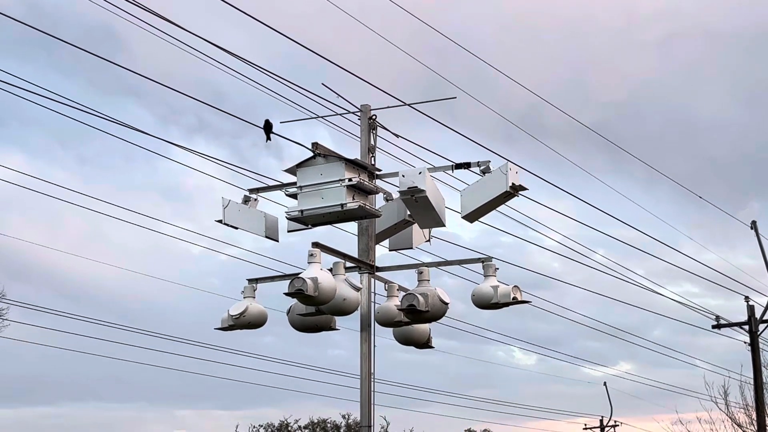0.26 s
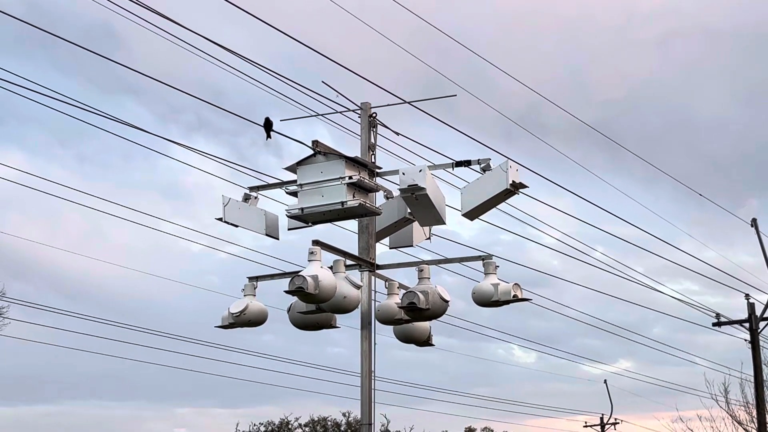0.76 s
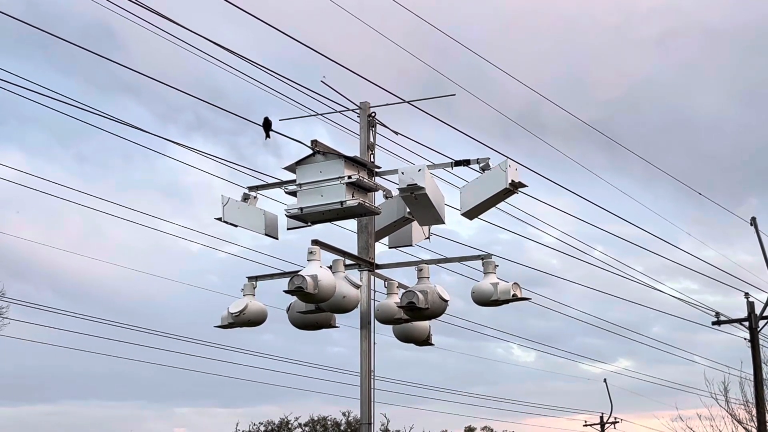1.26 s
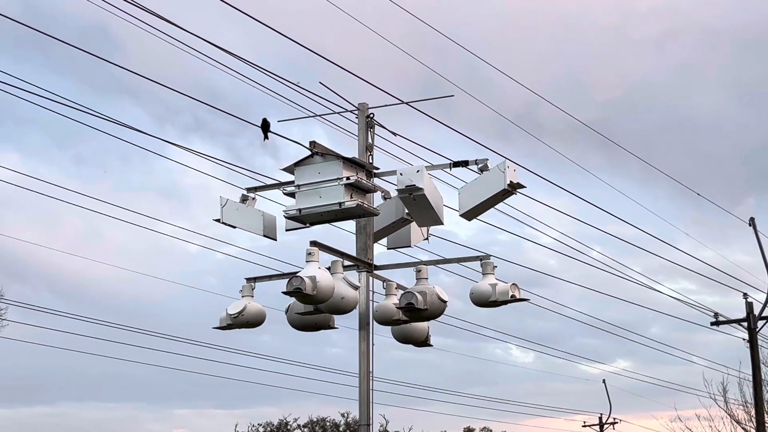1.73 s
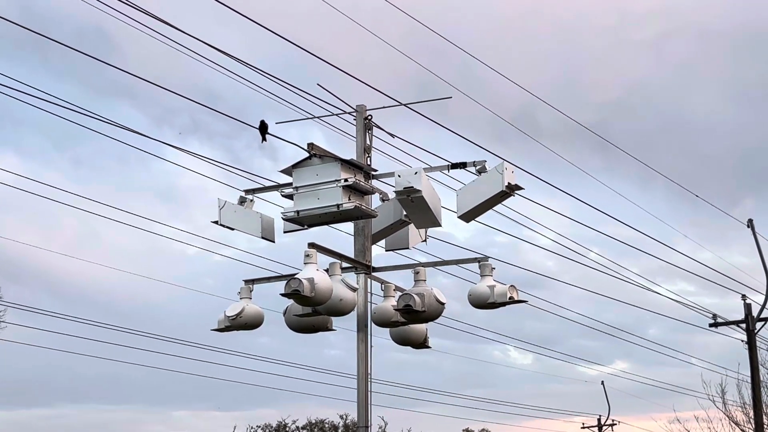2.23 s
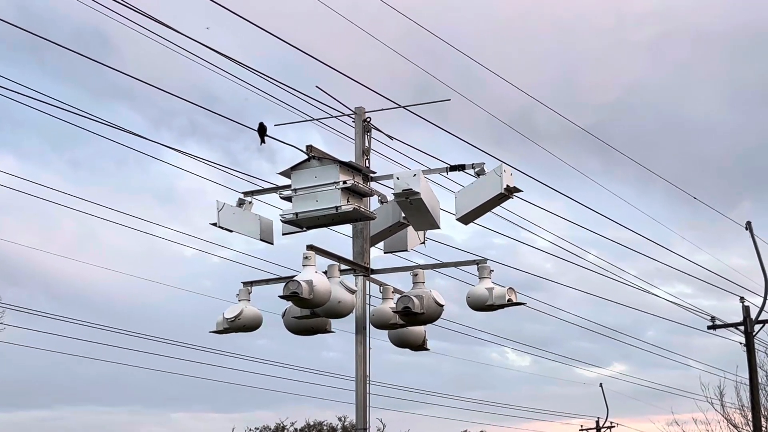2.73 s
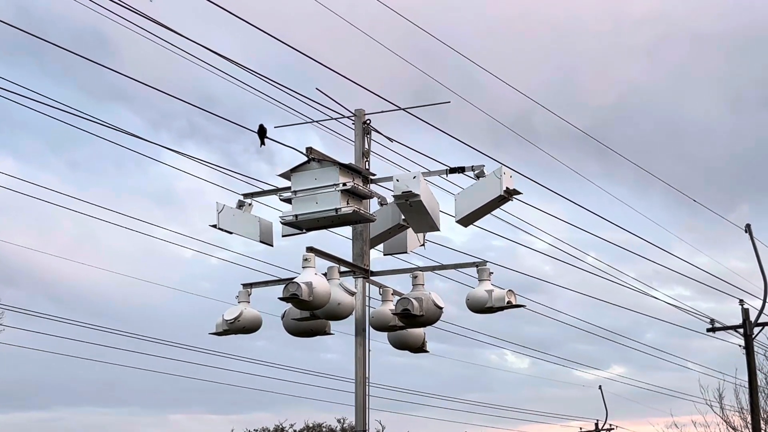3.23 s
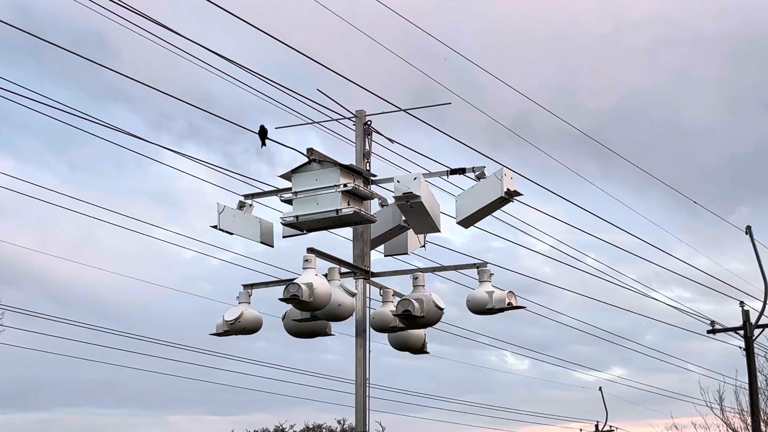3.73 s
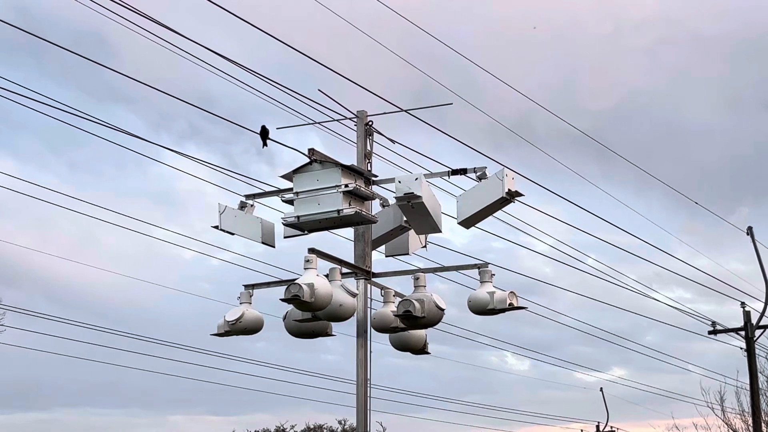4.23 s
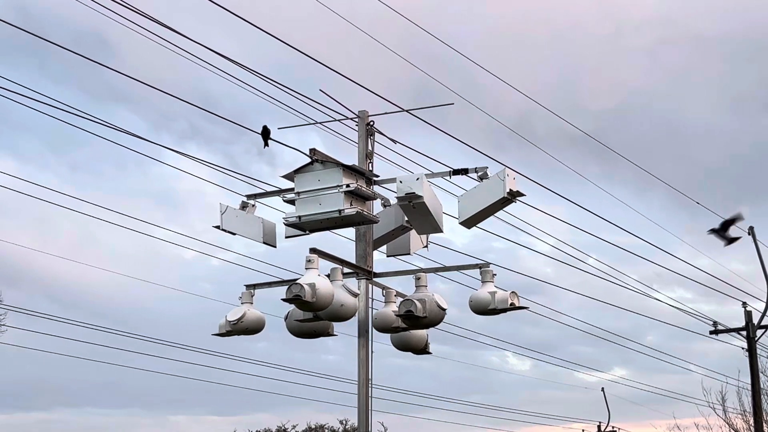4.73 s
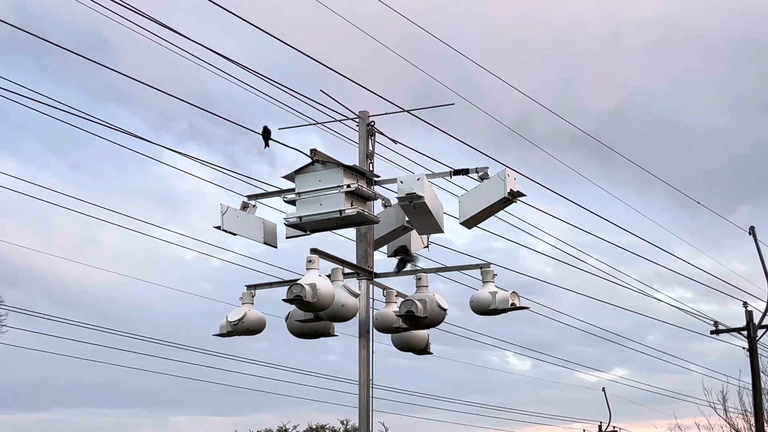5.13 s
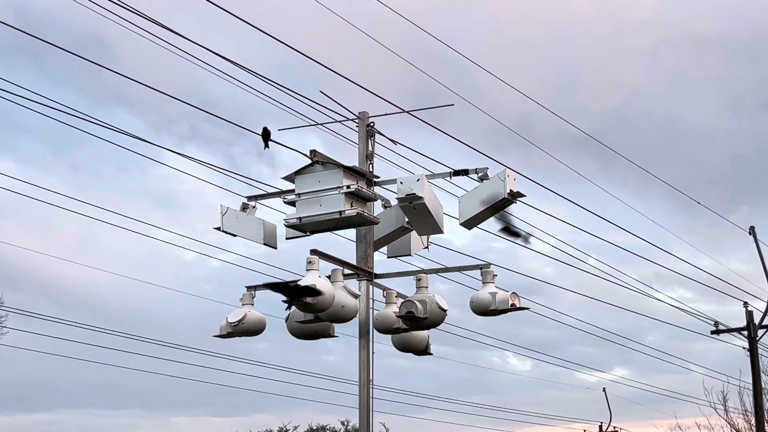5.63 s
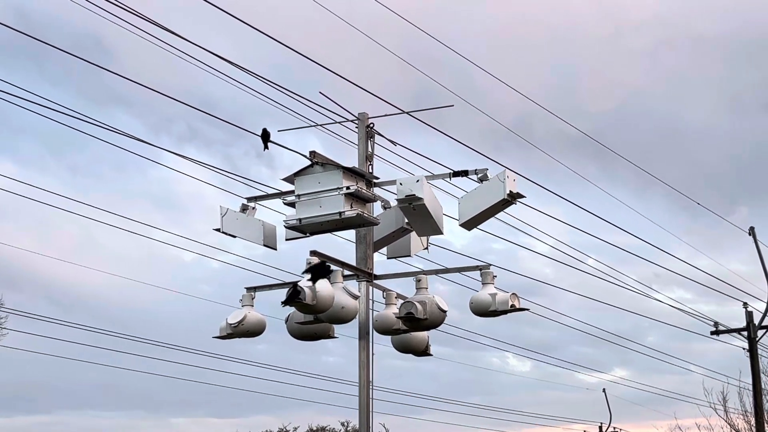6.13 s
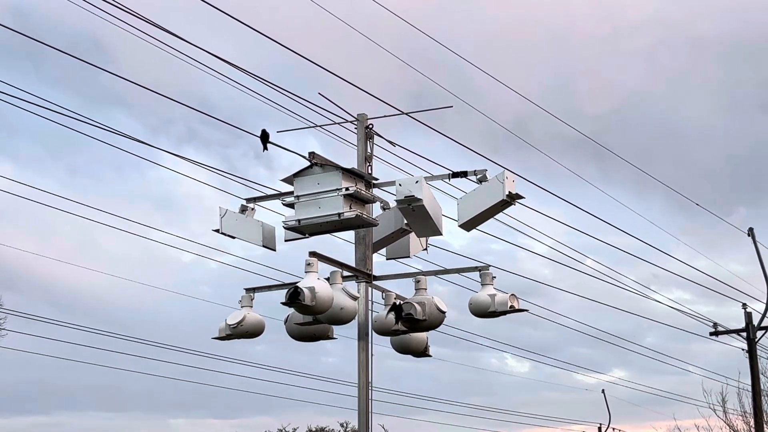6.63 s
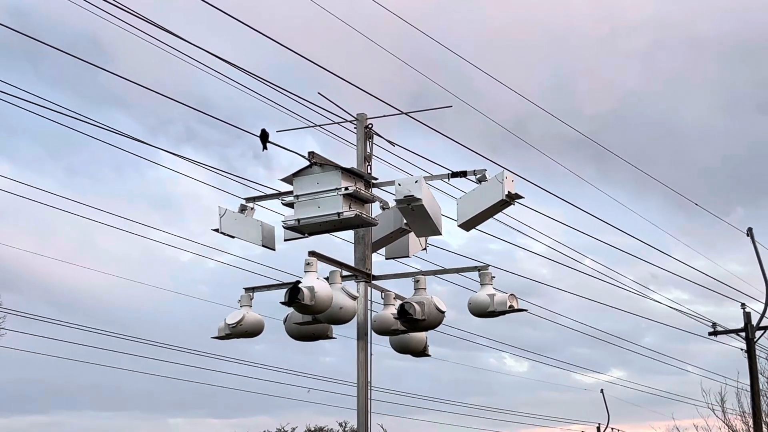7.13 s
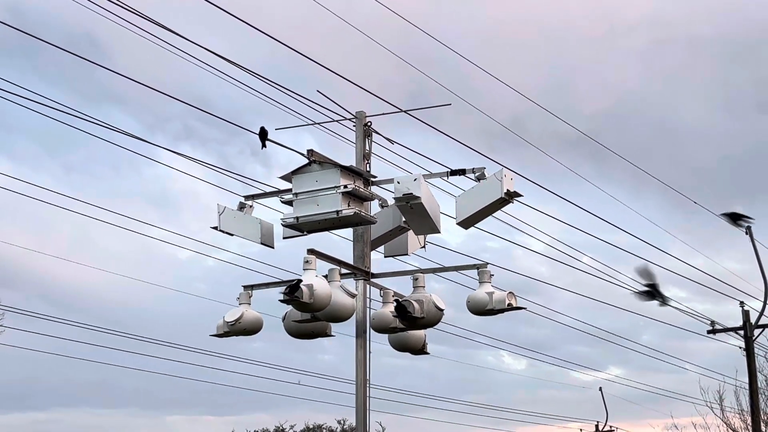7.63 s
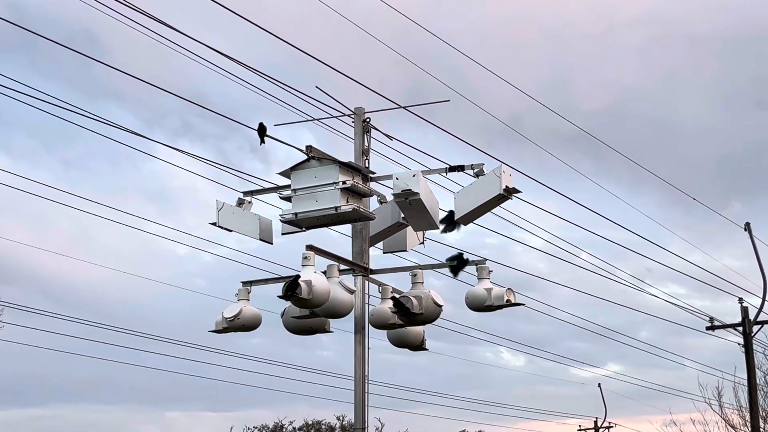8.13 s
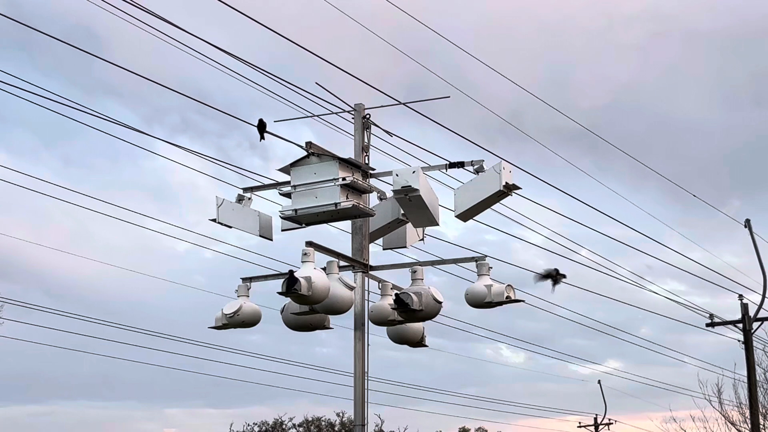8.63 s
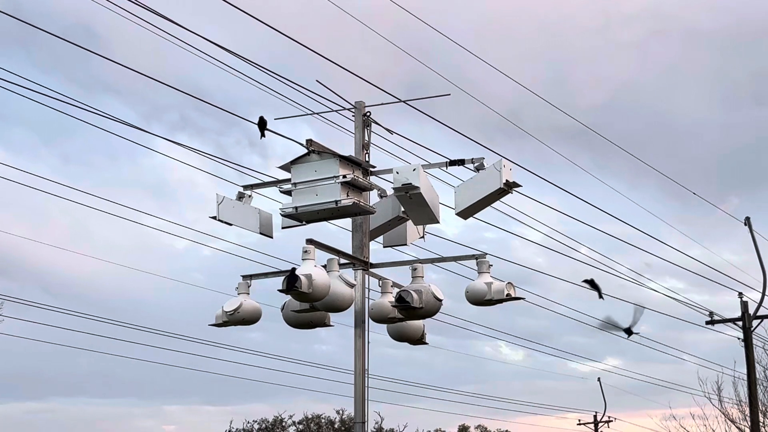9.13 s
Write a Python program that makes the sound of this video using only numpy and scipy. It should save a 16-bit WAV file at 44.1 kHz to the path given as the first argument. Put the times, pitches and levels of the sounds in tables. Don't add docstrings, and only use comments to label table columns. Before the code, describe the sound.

A small swallow colony at nest boxes on a pole, outdoors over a steady low town rumble. A faint songbird phrase and small pips come first, then scattered burry whistles falling in pitch. Around halfway, loud quick chirps and liquid gulping runs crowd in, with a far flock behind. The songbird returns, calls grow stronger, and a dry rattle comes near the end. Small stereo camera microphone, with short wall echoes.

```python
import sys
import numpy as np
from scipy import signal
from scipy.fft import rfft, irfft, next_fast_len
from scipy.io import wavfile
from scipy.ndimage import uniform_filter1d

SR = 44100
rng = np.random.default_rng(int(sys.argv[2]) if len(sys.argv) > 2 else 0)


def gain_from_db(level_db):
    decades = np.asarray(level_db, float) / 20
    return 10 ** decades


def dump(signal):
    limited = np.clip(np.atleast_2d(signal).T, -1, 1)
    pcm = np.round(limited * 32767).astype(np.int16)
    wavfile.write(sys.argv[1], SR, pcm)


N = 412776

# (frequency [Hz], level per Hz [dB])
TOWN = [(21, -65), (35, -4), (87, -1.5), (122, -9), (156, -9), (203, -18.5), (584, -24), (859, -23.5),
        (1290, -29.5), (1680, -20), (2360, -35.5), (4970, -42.5), (11000, -71), (14300, -106),
        (22000, -120)]
# (frequency [Hz], level per Hz [dB])
TOWN_SIDE = [(21, -47), (35, -17), (92, -10.5), (277, -20), (305, -19), (407, -17.5), (1770, -17),
             (2300, -34), (4970, -107), (5740, -37.5), (11000, -64), (14300, -104), (22000, -120)]
# (frequency [Hz], share [0-1], phase turn [rad])
LINKED = [(100, 0.5, 1.5), (400, 0.4, 0.8), (1110, 0.45, 0.94), (1600, 0.2, 2.4), (6000, 1, 1.57)]
TOWN_DB, TOWN_SIDE_DB = -47.5, -57
HUM_HZ, HUM_WIDTH_HZ, HUM_DB = 94.5, 10.4, -50

# (multiple of the pitch [-], level [dB])
OVERTONES = [(2, -17), (3, -25.5), (4, -35), (5, -32), (6, -29)]
BRIGHT_HZ, BRIGHT_DB_PER_OCTAVE = 3600, 18.5
EDGE_HZ = 15790

# (time after its start [s], length [ms], first pitch [Hz], last pitch [Hz], peak [dB])
PHRASE = [(0, 22, 3690, 3910, -56.5), (.018, 65, 3900, 3870, -61), (.01, 17, 2920, 2560, -59),
          (.066, 26, 4560, 4280, -71), (0.098, 24.3, 2680, 3000, -50.5), (.134, 19, 2960, 2680, -59),
          (.185, 40, 1940, 2780, -60), (.237, 30, 2505, 3070, -51.5)]
# (time [s], level [dB])
PHRASES = [
    (-.105, 1),
    (0.174, 2),
    (0.456, 3),
    (6.203, 2),
    (6.488, 1.5),
    (6.76, 3),
    (7.042, 3.5),
]
# (from [s], to [s])
PAUSE = (.63, 6.2)
SONG_ECHO_S, SONG_ECHO_DB = 0.13, -8

# (time [s], length [ms], first pitch [Hz], peak [dB])
PIPS = [(.001, 20, 2880, -65), (.93, 17, 2690, -50), (1.012, 36, 2160, -57), (1.092, 33, 2630, -58),
        (1.106, 29, 2310, -54), (1.246, 19, 2240, -57), (1.307, 13, 2300, -63), (1.365, 16, 3530, -49.5),
        (1.384, 9, 3300, -56), (1.398, 32, 3450, -58), (1.394, 10, 4760, -67), (1.429, 29, 3150, -51.5),
        (1.479, 33, 2714, -54), (1.534, 14, 2330, -55), (1.548, 40, 3600, -58), (1.575, 40, 3840, -57.5),
        (1.605, 42, 3360, -57), (1.593, 17, 2250, -52), (1.918, 25, 2110, -70), (2.893, 19, 2450, -54),
        (4.674, 11, 2110, -49), (4.682, 34, 2590, -53), (4.71, 28, 3250, -58), (5.184, 18, 3600, -51),
        (5.543, 41, 2040, -52.5), (5.583, 30, 1940, -50), (5.591, 18, 3900, -53), (5.647, 35, 2340, -51.5),
        (5.986, 13, 2370, -48), (6.296, 27, 3020, -46), (6.348, 16, 2975, -47.5), (6.515, 20, 2370, -55),
        (6.54, 22, 2110, -56), (6.575, 40, 2170, -54.5), (7.53, 16, 3940, -67), (7.66, 32, 2810, -61),
        (8.194, 18, 2630, -50), (8.268, 16, 2670, -52), (9.034, 39, 2230, -48)]
# (time [s], length [ms], first pitch [Hz], peak [dB])
SLIDES = [(1.305, 11, 2830, -55.5), (1.417, 35, 3000, -57), (1.425, 19, 5020, -61),
          (1.856, 32, 3600, -45.5), (1.871, 40, 5400, -57.5), (.15, 18, 4130, -61), (8.99, 15, 3280, -60),
          (2.898, 23, 5530, -60), (4.641, 31, 3850, -43.5), (4.663, 30, 5600, -56.5),
          (4.991, 16, 5000, -64), (2.918, 30, 3130, -48), (4.982, 18, 3480, -40.5),
          (5.013, 23.5, 3425, -37.5), (5.204, 28, 6000, -67), (5.19, 38, 3800, -41.5),
          (5.276, 24, 3350, -39.5), (5.309, 28, 3370, -37.5), (5.326, 49, 5450, -54.5),
          (5.718, 18, 3163, -45.5), (5.831, 33, 3740, -38), (5.995, 36, 4810, -49.5), (7.8, 57, 3030, -47),
          (8.208, 34, 3600, -72), (8.3, 25, 3160, -51), (8.786, 13, 2920, -56), (9.0, 12, 3310, -46),
          (9.012, 9.9, 4720, -49), (9.021, 14, 5760, -57)]
# (time [s], length [ms], first pitch [Hz], peak [dB])
DIPS = [(1.4, 15, 5040, -62), (1.402, 16, 2400, -60), (1.436, 18, 4460, -61), (1.455, 21, 4140, -55),
        (1.901, 32, 2820, -51), (2.948, 22, 2480, -51.5), (5.025, 18, 4960, -67), (4.598, 11, 3170, -59),
        (4.683, 23, 3770, -54), (4.73, 21, 3740, -54), (5.233, 29, 3890, -48), (5.238, 22, 5500, -65),
        (5.36, 37, 4740, -57), (5.547, 50, 4220, -54.5), (5.608, 13.6, 3340, -45.5),
        (6.036, 22, 3670, -46.5), (6.646, 71, 3700, -59), (6.938, 29, 4080, -56.5),
        (7.525, 8.6, 3530, -46.5), (7.545, 8.7, 3360, -48), (7.555, 19, 4530, -67),
        (7.768, 14.4, 3290, -43.5), (7.795, 18, 5500, -69), (7.812, 24.4, 4800, -61),
        (8.176, 14.5, 2910, -44), (8.702, 9.3, 3520, -45.5), (8.598, 9.9, 5600, -60), (8.612, 9, 5270, -61),
        (8.625, 8.4, 5470, -56), (8.637, 15, 5620, -61), (8.651, 8.6, 5200, -66), (8.672, 7, 5730, -62),
        (9.04, 15, 5150, -52), (9.108, 12, 4600, -53), (9.122, 21, 5000, -58)]
# (time [s], length [ms], first pitch [Hz], peak [dB])
EASES = [(.165, 45, 2980, -57.5), (.204, 40, 2490, -51.5), (.472, 20, 2800, -60), (.488, 34, 2390, -53),
         (8.574, 9.5, 2075, -51.5), (8.652, 9.6, 2460, -43.5), (8.666, 13, 2360, -47),
         (1.405, 30, 2380, -61), (1.54, 28, 2420, -58), (5.37, 23, 3530, -47), (8.2, 13, 2800, -56),
         (5.002, 17, 2310, -44), (5.036, 19, 2350, -48), (5.055, 14, 2200, -50), (8.222, 11, 1780, -51),
         (7.81, 18, 2670, -48), (7.83, 13, 2070, -47), (1.445, 20, 2250, -56), (1.468, 18, 2200, -57),
         (2.93, 12, 2290, -56), (9.06, 13, 3020, -46), (9.073, 16, 2900, -47), (9.085, 12, 2920, -46)]
# (time [s], length [ms], first pitch [Hz], peak [dB])
RATTLE = [
    (9.001, 29, 3790, -36),
    (9.211, 9, 3950, -40.5),
    (9.223, 10.3, 3980, -45),
    (9.235, 15, 3990, -38),
    (9.247, 14, 3780, -45.5),
    (9.26, 15.5, 3700, -40.5),
    (9.274, 17, 3340, -43),
    (9.291, 12, 2920, -55),
]
SLIDE_FALL, DIP_FALL, PIP_FALL, EASE_FALL, RATTLE_FALL = 0.52, 0.69, .94, .84, 0.57
# (middle [s], body pitch [Hz], peak [dB])
GULPS = [(4.608, 1785, -58), (4.632, 1970, -54), (4.651, 2050, -58), (4.8, 1854, -52.5), (4.826, 2053, -47),
         (4.852, 2200, -45.5), (4.97, 1925, -44.5), (5.078, 1900, -46.5), (5.098, 2080, -43.5),
         (5.116, 1960, -49), (5.263, 2030, -42), (5.279, 1992, -47), (5.293, 2210, -40), (5.325, 2317, -47),
         (5.338, 2188, -43), (5.368, 1964, -46), (5.389, 1855, -48), (5.413, 1965, -43), (5.687, 1600, -54),
         (5.712, 1673, -48), (5.735, 1940, -45), (5.752, 2110, -58), (5.887, 1860, -48),
         (5.912, 1957, -43.5), (5.94, 2050, -42), (6.03, 2170, -45.5), (6.09, 1823, -46.5),
         (6.118, 2015, -41), (6.146, 2150, -42), (7.518, 1583, -52.5), (7.538, 1986, -47),
         (7.562, 2025, -48.5), (7.72, 1980, -50.5), (7.747, 2134, -41.5), (7.774, 2150, -42.5),
         (7.919, 1970, -43), (7.945, 2195, -39.5), (7.971, 2210, -43.5), (8.123, 1920, -43.5),
         (8.151, 2130, -38.5), (8.178, 2158, -40.5), (8.198, 2050, -49), (8.242, 2055, -43.5),
         (8.262, 1975, -46), (8.294, 2053, -43), (8.318, 2217, -48.5), (8.8, 1500, -56),
         (8.824, 1890, -44.5), (8.852, 2113, -40), (8.879, 2200, -42)]
GULP_MS, GULP_SAG, GULP_DROP_IN, GULP_DROP_OUT = 24, 0.1594, 0.47, 0.84
GULP_BODY, GULP_LEAD_DB = 0.76, -7
GULP_BEATS, GULP_BEAT_DEPTH = 1.56, 0.36
RASP_FROM_HZ, RASP_WIDTH_HZ, RASP_CLEAN_DB, RASP_DB = 4160, 600, -2, -5
SPRAY_DB, SPRAY_SMEAR_S = -26, 0.024
# (frequency [Hz], level [dB])
SPRAY = [(1200, -0.5), (2500, 12), (4500, -2.5), (6000, -10), (8000, -13.5), (11000, -22), (15000, -19.5)]
CHATTER_DB = 2

# (time [s], level [dB])
FLOCK = [(1.3, -91), (1.45, -53.5), (2.0, -61), (2.2, -69.5), (4.5, -70), (4.652, -55), (5.15, -62),
         (5.35, -38), (5.5, -56.5), (5.999, -48), (6.851, -57), (8.199, -42.5), (8.9, -54.5), (9.05, -40.5),
         (9.36, -46.5)]

# (warbles per second [1/s], overtone strength [dB], opening as share of top pitch [-],
# crest as share of length [-], bend of the fall [-], fade [dB], soft start [dB], steady sag [dB])
VOICES = [
    (120.4, -8, 0.87, 0.0476, 1.7, -22, -8, -0.5),
    (132.6, -5, 0.98, 0.12, 1.3, -23, -7, 3.5),
    (126.8, -8.5, 0.94, 0.0717, 2.9, -12.5, -3, 2.5),
    (155.6, -9.5, 0.94, 0.28, 0.92, -13, -15, -2),
    (147.9, -8, .8, 0.19, 2.3, -2.5, -7.5, 2),
    (85.7, -4.5, 0.81, 0.149, 2.1, -37, 3.5, 1.5),
    (150.3, -10.5, 0.89, .2, 1.9, -11, -0.5, -6.5),
    (133.5, -13.5, 0.62, 0.054, 1.2, -11, -4, -1.5),
    (123.5, -9.5, .82, 0.145, 1.5, 5, -19, 0.5),
]
UPPER_DB = [-0.5, 4, 1, -1, 3.5, -1, -0.5, 11, 2.5]
# (start [s], length [s], top pitch [Hz], last pitch [Hz], level [dB])
SLOW_FALLS = [
    (1.466, 0.15, 3480, 2230, -48),
    (2.913, 0.14, 4106, 3030, -47.5),
    (4.82, 0.15, 3456, 2246, -37.5),
    (7.33, 0.093, 2940, 2030, -40.5),
]
# (start [s], length [s], top pitch [Hz], last pitch [Hz], level [dB])
FAST_FALLS = [
    (1.646, 0.2, 4090, 2440, -46),
    (5.623, 0.071, 4182, 3960, -43),
    (5.674, 0.036, 3170, 2574, -37.5),
    (8.85, 0.067, 4000, 3420, -68.5),
]
# (start [s], length [s], top pitch [Hz], last pitch [Hz], level [dB])
SLOW_ARCHES = [(2.734, 0.04, 3330, 3210, -57), (3.03, 0.063, 2200, 2280, -56.5),
               (4.292, 0.063, 2420, 2300, -47), (4.365, 0.0407, 2300, 2500, -57.5),
               (8.47, .09, 2600, 2450, -47), (8.4, .07, 2677, 2356, -36.5), (3.73, .12, 3427, 2374, -45.5),
               (4.148, 0.17, 4050, 2450, -45), (5.962, 0.074, 3650, 3280, -40.5),
               (7.268, 0.13, 3390, 2850, -38.5)]
# (start [s], length [s], top pitch [Hz], last pitch [Hz], level [dB])
FAST_ARCHES = [
    (3.968, 0.13, 4166, 3230, -46.5),
    (5.651, 0.023, 4870, 4920, -52),
    (5.901, 0.0774, 4100, 3960, -39),
    (7.622, 0.15, 4100, 3920, -66.5),
]
# (start [s], length [s], top pitch [Hz], last pitch [Hz], level [dB])
SCOOPS = [(2.893, 0.18, 3400, 2320, -46.5), (5.775, 0.19, 3640, 2523, -39),
          (6.114, 0.19, 3460, 2513, -47.5), (6.461, .21, 3377, 2555, -51), (7.079, 0.078, 3945, 3600, -42),
          (7.097, 0.091, 3124, 2732, -40.5)]
# (start [s], length [s], top pitch [Hz], last pitch [Hz], level [dB])
TRILLS = [
    (8.556, 0.066, 2900, 2580, -52),
    (8.591, 0.1, 3270, 2366, -42.5),
    (9.029, 0.1, 3140, 2635, -46.5),
]
# (start [s], length [s], top pitch [Hz], last pitch [Hz], level [dB])
LOUD_ARCH = [
    (7.832, .13, 4036, 2900, -31.5),
]
# (start [s], length [s], top pitch [Hz], last pitch [Hz], level [dB])
LOUD_FALL = [
    (8.291, 0.15, 4285, 2657, -34.5),
]
# (start [s], length [s], top pitch [Hz], last pitch [Hz], level [dB])
SWELL = [
    (2.635, .118, 3933, 3310, -46),
]
DULLING = 0.32
SETTLE = 0.99

# (delay [s], level [dB])
WALLS = [(.004, -2.5), (.013, -12.5), (.068, -19), (.096, -15.5)]
YARD_T60_S, YARD_DB = 0.54, -3
TREBLE_HZ, TREBLE_T60_SHARE = 3560, 0.85

# (frequency [Hz], phase [rad])
PORTS = [(0, 0), (860, 1.4), (1400, 4.8), (1800, 4.8), (2150, 6.2), (3100, 6.7), (4000, 6.35), (5170, 6.3),
         (5770, 4.7), (6800, 3.3), (7670, 0.6), (10100, -0.3), (11800, -2.45), (12700, -2.9), (13700, -3.3),
         (14700, -5.5), (15800, -6.4)]
# (frequency [Hz], level [dB])
COLOUR = [(1000, -0.5), (1750, -1.5), (2150, -2.5), (4300, 1.5), (5200, 0), (6300, 2.5), (8000, 0.5),
          (9400, 4), (11000, 6.5), (12400, 9), (12900, -20), (13500, 8), (14500, 4)]


def evened(x):
    return x / np.sqrt(np.mean(x ** 2) + 1e-20)


def read(points, hz):
    f, value = np.transpose(points)
    return np.interp(np.log(hz + 1), np.log(f + 1), value)


def add(mix, s, sound):
    part = mix[round(s * SR):][:len(sound)]
    part += sound[:len(part)]


def hum():
    low = rng.standard_normal((2, N))
    for _ in range(2):
        low = signal.lfilter([1], [1, -np.exp(-np.pi * HUM_WIDTH_HZ / SR)], low)
    turn = 2 * np.pi * HUM_HZ * np.arange(N) / SR
    level = gain_from_db(HUM_DB + np.linspace(-3, 2.5, N))
    return level * evened(low[0] * np.cos(turn) + low[1] * np.sin(turn))


def town():
    hz = np.fft.rfftfreq(4096, 1 / SR)
    a, b, c, d, patches = rng.standard_normal((N // 1024 + 5, 2049, 5)).T
    patches = uniform_filter1d(patches, size=40, axis=0)
    patches_db = evened(uniform_filter1d(patches, size=5, axis=1))
    share = np.clip(read([row[:2] for row in LINKED], hz), 0, 1)[:, None]
    turn = np.exp(1j * read([row[::2] for row in LINKED], hz))[:, None]
    mid = a + 1j * b
    side = share * turn * mid + np.sqrt(1 - share ** 2) * (c + 1j * d)
    treble_cut_db = -60 * np.clip((hz - 11300) / 1000, 0, 1)
    shapes = np.array([read(TOWN, hz), read(TOWN_SIDE, hz)]) + treble_cut_db
    shapes[0] += 4 * (hz > 6900) - 25 * np.exp(-((hz - 6850) / 130) ** 2)
    z = np.array([mid, side]) * gain_from_db(shapes[..., None] + patches_db)
    mid, side = signal.istft(z, nperseg=4096, noverlap=3072)[1][:, :N]
    return gain_from_db(TOWN_DB) * evened(mid) + hum(), gain_from_db(TOWN_SIDE_DB) * evened(side)


def whistle(hz, bright_db=0, upper_db=0):
    turn = 2 * np.pi * np.cumsum(hz) / SR
    upper = np.zeros(len(hz))
    for k, db in OVERTONES:
        upper += gain_from_db(db + upper_db * (k > 2)) * np.sin(k * turn) * (k * hz < EDGE_HZ)
    lift_db = BRIGHT_DB_PER_OCTAVE * np.log2(np.clip(hz / BRIGHT_HZ, .1, 1.2))
    return np.sqrt(2) * (np.sin(turn) + gain_from_db(bright_db + lift_db) * upper)


def chirp(s, ms, first_hz, last_hz, db, bright_db=-14, hook=1.2, waver=.012):
    u = np.linspace(0, 1, round(ms * SR / 1000))
    a, b = rng.random(2)
    slide = first_hz + (last_hz - first_hz) * u ** hook
    pitch = slide * (1 + waver * np.sin(2 * np.pi * (0.0563 * ms * u + a)))
    flutter = 1 + 0.34 * np.sin(2 * np.pi * (0.092 * ms * u + b))
    fades = np.sin(np.pi * u ** .8) ** .9
    return s, gain_from_db(db) * flutter * whistle(pitch, bright_db) * fades


def songbird():
    out, lead = np.zeros(N), .2
    for start, loud_db in PHRASES:
        for s, ms, first_hz, last_hz, db in PHRASE:
            if not PAUSE[0] < start + s < PAUSE[1]:
                add(out, *chirp(lead + start + s, ms, first_hz, last_hz, db + loud_db, -12, waver=.01))
    heard = 1.19 * out + gain_from_db(SONG_ECHO_DB) * np.roll(out, round(SONG_ECHO_S * SR))
    heard = heard + gain_from_db(0.5) * yard(out, .6)
    return np.roll(heard, -round(lead * SR)) * (np.arange(N) < N - lead * SR)


def gulp(s, hz, db):
    u = np.linspace(-1, 1, round(GULP_MS * SR / 1000))
    drop = np.where(u < 0, GULP_DROP_IN, GULP_DROP_OUT)
    pitch = hz * (1 - GULP_SAG * u - drop * u ** 5)
    body = np.exp(-(u / GULP_BODY) ** 4)
    level = np.maximum(body, gain_from_db(GULP_LEAD_DB) * (u < 0)) * signal.windows.tukey(len(u), .2)
    beat = np.cos(2 * np.pi * (GULP_BEATS * u + 0.32 * rng.standard_normal()))
    level = level * (1 + GULP_BEAT_DEPTH * beat)
    return s - GULP_MS / 2000, gain_from_db(db) * level * whistle(pitch, -18)


def chatter():
    out = np.zeros(N)
    for row in GULPS:
        add(out, *gulp(*row))
    kinds = ((SLIDES, SLIDE_FALL, .85), (DIPS, DIP_FALL, .9), (PIPS, PIP_FALL, 1.2),
             (EASES, EASE_FALL, .7), (RATTLE, RATTLE_FALL, .9))
    for notes, fall, bend in kinds:
        for s, ms, hz, db in notes:
            add(out, *chirp(s, ms, hz, hz * fall, db, hook=bend))
    return out


def hoarse(x):
    size = next_fast_len(N)
    hz, z = np.fft.rfftfreq(size, 1 / SR), rfft(x, size)
    treble = irfft(z * np.clip((hz - RASP_FROM_HZ) / 600, 0, 1), size)[:N]
    a, b = rfft(rng.standard_normal((2, size)))
    shake = evened(irfft(a * np.exp(-(hz / RASP_WIDTH_HZ) ** 2), size)[:N])
    spray = evened(irfft(b * gain_from_db(read(SPRAY, hz)), size)[:N])
    effort = np.sqrt(abs(uniform_filter1d(np.gradient(x) ** 2, size=round(SPRAY_SMEAR_S * SR))))
    rough = treble * (gain_from_db(RASP_CLEAN_DB) + gain_from_db(RASP_DB) * shake)
    return x - treble + rough + gain_from_db(SPRAY_DB) * 10 * effort * spray


def flock(per_s=130):
    out = np.zeros(N)
    for when, pitch, fall, length, size in rng.random((round(per_s * N / SR), 5)):
        hz, ms = 2100 + 1550 * pitch ** 1.3, 8 + 12 * length
        last_hz = hz * (1 - (.006 + .012 * fall) * ms)
        add(out, *chirp(when * N / SR, ms, hz, last_hz, -8 * size))
    return out


def contour(start, length, top_hz, last_hz, db, opening, crest, bend, fade_db, soft_db, sag_db):
    u = np.linspace(0, 1, 17)
    up = np.clip(u / max(crest, .01), 0, 1)
    down = np.clip((u - crest) / (SETTLE - crest), 0, 1)
    fall = np.sin(np.pi / 2 * down) ** bend
    hz = top_hz * (opening + (1 - opening) * up) - (top_hz - last_hz) * fall
    level_db = db + soft_db * (1 - u) ** 5.2 + fade_db * u ** 6.8 + sag_db * u
    return np.transpose([start + u * length, hz, level_db])


def burr(rows, rate, bright_db, upper_db, start):
    swing_hz, throb, jitter = 215., .4, .09
    s, hz, db = np.transpose(rows)
    t = np.arange(s[0], s[-1], 1 / SR)
    uneven = 1 + jitter * np.sin(2 * np.pi * (23 * t + start))
    shake = 2 * np.pi * (np.cumsum(rate * uneven) / SR + start)
    slow = (135 / rate) ** 1.5
    warble = np.sin(shake) - 0.13 * slow * np.sin(2 * shake)
    pitch = uniform_filter1d(np.interp(t, s, hz), size=500, mode="nearest")
    pitch = pitch + swing_hz * slow * (warble - .3) * (pitch / 3700) ** 1.3
    throbs = evened(1 + throb * np.sqrt(slow) * np.sin(shake - .6 * slow))
    level = gain_from_db(np.interp(t, s, db)) * throbs
    return s[0], level * whistle(pitch, bright_db - 1.5, upper_db) * signal.windows.tukey(len(t), .25)


def burrs():
    out = np.zeros(N)
    kinds = (SLOW_FALLS, FAST_FALLS, SLOW_ARCHES, FAST_ARCHES, SCOOPS, TRILLS, LOUD_ARCH, LOUD_FALL, SWELL)
    for calls, voice, upper_db in zip(kinds, VOICES, UPPER_DB):
        for call in calls:
            bright_db = voice[1] - DULLING * (call[-1] + 40)
            add(out, *burr(contour(*call, *voice[2:]), voice[0], bright_db, upper_db, rng.random()))
    return out


def walls(x):
    taps = np.zeros(SR // 4)
    for delay, db in WALLS:
        smear = rng.standard_normal(400) * np.hanning(400)
        add(taps, delay, gain_from_db(db) * smear / np.linalg.norm(smear))
    return signal.fftconvolve(x, taps)[:N]


def yard(x, t60):
    taps, slots = np.zeros(SR), np.arange(900, SR - 20, 20)
    taps[slots + rng.integers(0, 20, len(slots))] = rng.choice([-1., 1.], len(slots))
    low = signal.sosfiltfilt(signal.butter(4, TREBLE_HZ, fs=SR, output="sos"), taps)
    fall_db = -60 * np.arange(SR) / SR / t60
    taps = low * gain_from_db(fall_db) + (taps - low) * gain_from_db(fall_db / TREBLE_T60_SHARE)
    return signal.fftconvolve(x, taps / np.linalg.norm(taps))[:N]


def ports(x):
    size = next_fast_len(N)
    hz = np.fft.rfftfreq(size, 1 / SR)
    half = np.exp(.5j * read(PORTS, hz))
    z = rfft(x, size) * gain_from_db(read(COLOUR, hz))
    return irfft(np.array([z * half, z / half]), size)[:, :N]


def scene():
    near = burrs() + gain_from_db(CHATTER_DB) * hoarse(chatter())
    far = flock()
    far = evened(far + gain_from_db(-2) * yard(far, YARD_T60_S))
    far = far * gain_from_db(np.interp(np.arange(N) / SR, *np.transpose(FLOCK)))
    wet = gain_from_db(YARD_DB) * yard(near, YARD_T60_S)
    spread = gain_from_db(-19.0) * yard(near + far, YARD_T60_S)
    mid, side = town()
    side = side + spread
    birds = gain_from_db(5.0) * near + walls(near) + wet + far + songbird()
    return ports(birds) + np.array([mid + side, mid - side])


def low_pass(x):
    return signal.sosfilt(signal.butter(12, 16290, fs=SR, output="sos"), x)


def record(dry):
    thin = signal.sosfilt(signal.butter(4, 40, "high", fs=SR, output="sos"), dry)
    band_limit = signal.firwin(511, EDGE_HZ, window=("kaiser", 9), fs=SR)
    mix = signal.oaconvolve(thin, band_limit[None], "same")
    return low_pass(mix)


dry = scene()
out = record(dry)
dump(out)
```